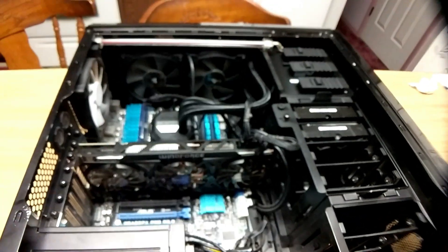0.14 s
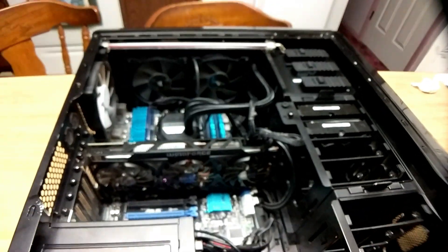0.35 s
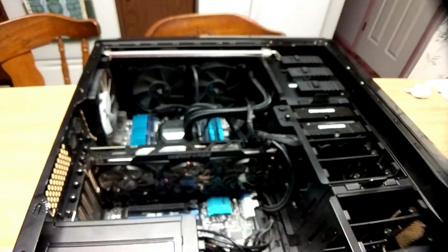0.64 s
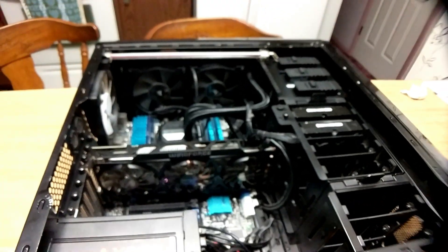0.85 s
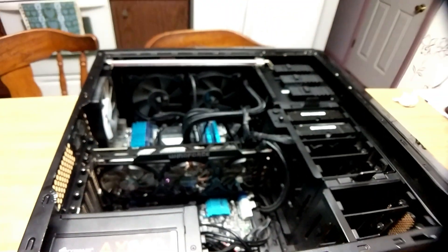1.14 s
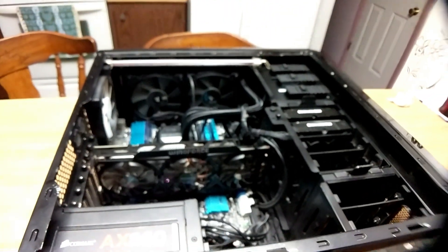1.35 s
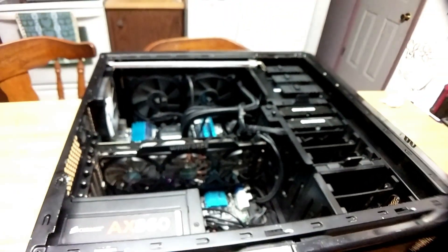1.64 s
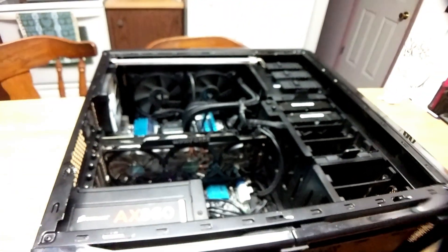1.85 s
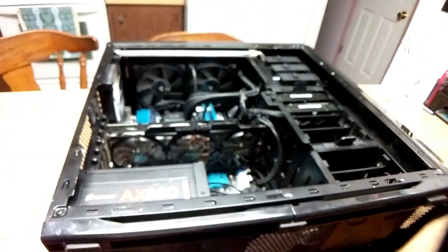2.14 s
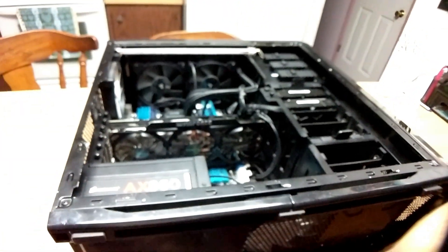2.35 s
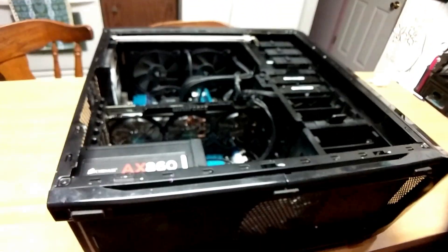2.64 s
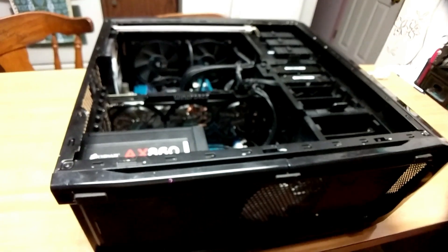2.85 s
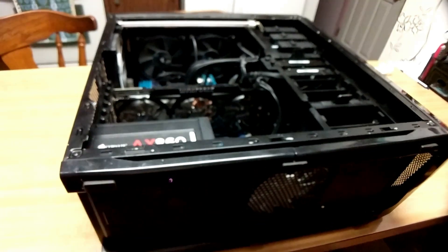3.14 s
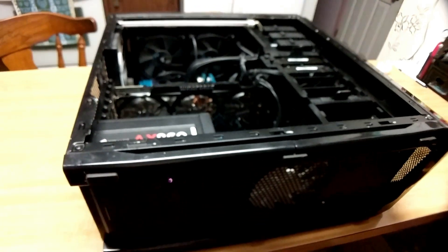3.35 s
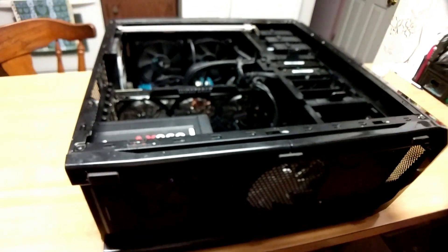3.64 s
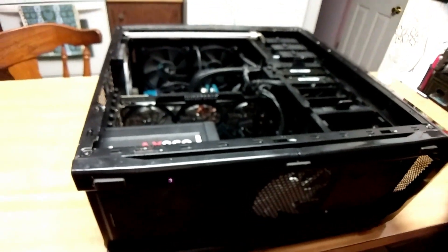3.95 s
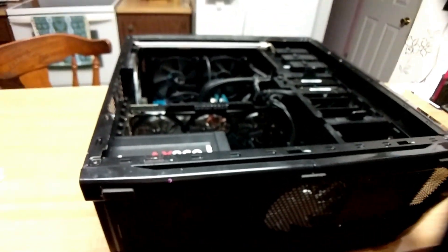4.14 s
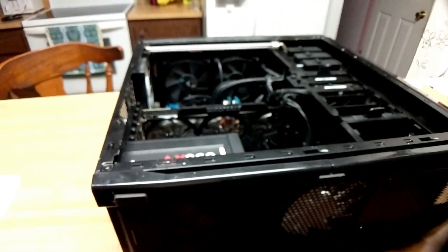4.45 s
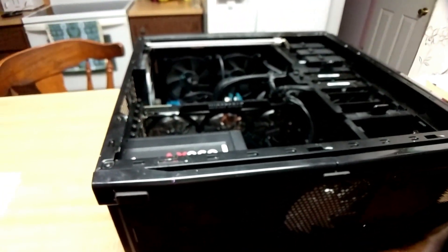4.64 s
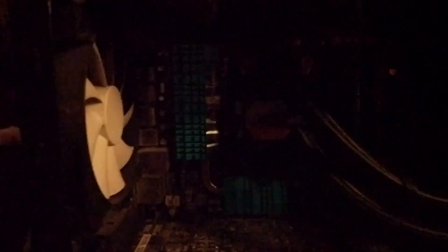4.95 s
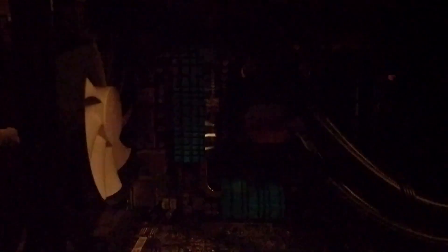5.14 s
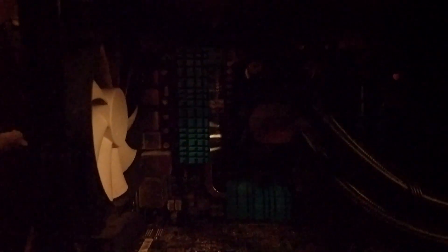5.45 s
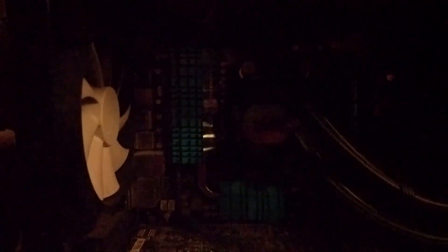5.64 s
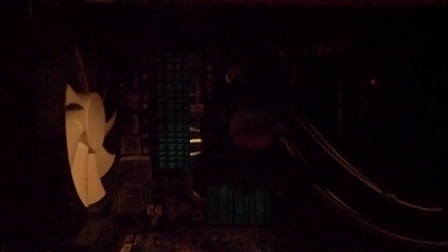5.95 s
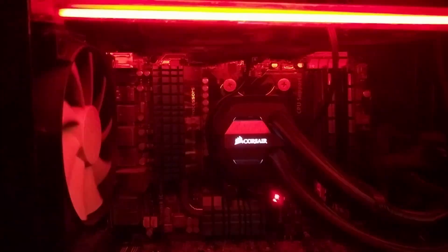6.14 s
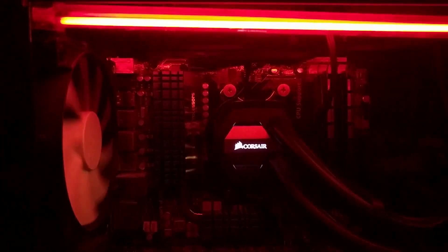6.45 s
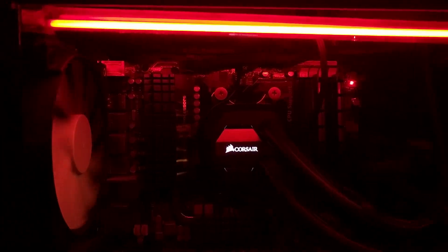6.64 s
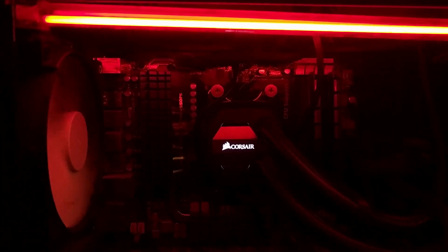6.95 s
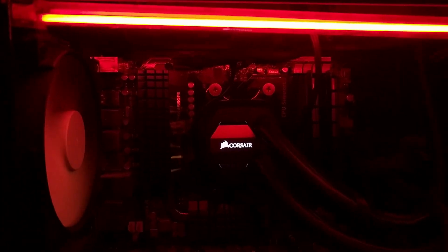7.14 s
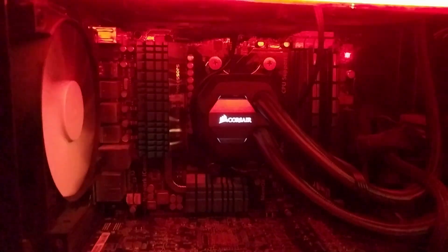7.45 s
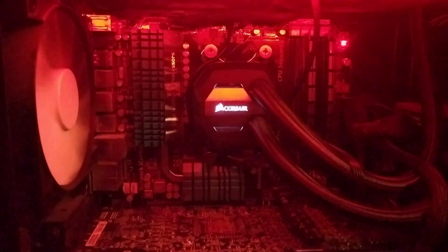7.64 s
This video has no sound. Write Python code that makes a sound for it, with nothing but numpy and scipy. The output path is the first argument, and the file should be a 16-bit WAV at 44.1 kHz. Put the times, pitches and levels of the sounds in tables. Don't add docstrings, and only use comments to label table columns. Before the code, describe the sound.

A handheld microphone moves round an open computer in a quiet room, with a low steady mains hum near 120 Hz, soft air noise and distant motor tones. A faint rub comes at 0.9 s; bassy grip thumps cluster at 1.5-1.9 with a small strap rasp, then more at 2.3 and 3.0. Tiny plastic creaks chirp at 2.0 and 2.5-2.9, and a hard dry knock lands at 3.9. At 4.75 the place switches abruptly to inside the metal case: brighter hissy air and thin fixed coil whine. A dull knock at 5.0 accompanies a drop in electric hiss. A power switch snaps at 6.0 and releases at 6.1; a knock and brief shrill squeal follow at 6.55. Fan tones climb from 6.7; at 7.15 the bass hum cuts out, a pump whistle sweeps upward, fading by 7.7, while blade tone and airy rush grow to the end, about 7.8.

```python
import sys
import numpy as np
from scipy import signal
from scipy.fft import rfft, irfft, next_fast_len
from scipy.io import wavfile
from scipy.ndimage import uniform_filter1d

SR = 44100
rng = np.random.default_rng(int(sys.argv[2]) if len(sys.argv) > 2 else 0)


def dump_mix(stems):
    frames = np.atleast_2d(stems).T
    limited = np.clip(frames, -1, 1)
    pcm = np.round(limited * 32767).astype(np.int16)
    wavfile.write(sys.argv[1], SR, pcm)


def convert_level_to_amplitude(level_db):
    exponent = np.asarray(level_db, float) / 20
    return 10 ** exponent


N = 343098
TIME = np.arange(N) / SR
MOVE_S, WIND_S = 4.745, 7.158


def curve(table):
    s, *columns = np.transpose(table)
    return [np.interp(TIME, s, column) for column in columns]


def level(x, db):
    return x * convert_level_to_amplitude(db) / np.sqrt(np.mean(x ** 2))


def walk(rate_hz):
    hold = int(SR / rate_hz)
    steps = np.repeat(rng.standard_normal(N // hold + 1), hold)
    return uniform_filter1d(uniform_filter1d(steps, hold), hold)[:N]


def step(s, fade_s):
    return np.clip((TIME - s) / fade_s, 0, 1)


def add(out, s, x):
    i = int(s * SR)
    out[i:i + len(x)] += x[:N - i]


def band(size, hz, width_hz):
    fast = next_fast_len(size)
    f = np.arange(fast // 2 + 1) * SR / fast + 1
    resonance = 1 / (1 + ((f - hz * hz / f) / width_hz) ** 2)
    noise = irfft(rfft(rng.standard_normal(fast)) * resonance, fast)
    return level(noise[:size], 0)


def tone(hz, db, from_s=0.):
    out, i = np.zeros(N), int(from_s * SR)
    turns = np.cumsum((hz + out)[i:]) / SR + rng.random()
    out[i:] = np.sqrt(2) * convert_level_to_amplitude((db + out)[i:]) * np.sin(2 * np.pi * turns)
    return out


def lines(table, waver_db, rate_hz, drift, from_s=0.):
    return sum(tone(hz * (1 + drift * walk(rate_hz)), db + waver_db * walk(rate_hz), from_s)
               for hz, db in table)


def overtones(base_hz, table, from_s):
    out = np.zeros(N)
    for multiple, hz, width_hz, db in table:
        pitch = multiple * base_hz
        resonance = 1 / (1 + (2 * (pitch - hz) / width_hz) ** 2) ** 2
        out += resonance * tone(pitch * (1 + .003 * walk(40)), db + 3.2 * walk(20), from_s)
    return step(from_s, .05) * out


def air(shape, modes, db, flicker_db):
    size = next_fast_len(N)
    f = np.arange(size // 2 + 1) * SR / size + 1
    shape_hz, shape_db = np.transpose(shape)
    gain_db = np.interp(np.log(f), np.log(shape_hz), shape_db, -90)
    for hz, width_hz, boost_db in modes:
        gain_db = gain_db + boost_db / (1 + (2 * (f - hz) / width_hz) ** 2)
    noise, swell_db = rfft(rng.standard_normal(size)) * convert_level_to_amplitude(gain_db), 1.07 * walk(1.38)
    scale = convert_level_to_amplitude(db) / np.std(irfft(noise * (f > 250), size))
    out = np.zeros(N)
    for centre_hz in 125 * 2. ** np.arange(8):
        octave = np.clip(1 - abs(np.log2(f / centre_hz)), 0, 1)
        out += irfft(noise * octave, size)[:N] * convert_level_to_amplitude(swell_db + flicker_db * walk(9))
    return scale * out


def ring(hits):
    out, t = np.zeros(N), np.arange(2000) / SR
    for s, db, hz, t60_ms in hits:
        onset = np.clip(6.3 * hz * t, 0, 1)
        decay = 1000. ** (-1000 * t / t60_ms)
        add(out, s, convert_level_to_amplitude(db) * np.sin(2 * np.pi * hz * t) * onset * decay)
    return out


def scrape(bursts, slips_hz):
    out, t = np.zeros(N), np.arange(4096) / SR
    slip = t * slips_hz
    for s, ms, db, hz, width_hz in bursts:
        press = np.clip(t / .0008, 0, 1) * np.clip(1 - (1000 * t / ms) ** 2, 0, 1)
        shape = press + 0.2 * np.exp(-t / 0.027)
        size = convert_level_to_amplitude(1.3 * np.tanh(rng.standard_normal(64)))[slip.astype(int) % 64]
        grip = 0.51 + size * np.exp(-(slip % 1) / 0.36)
        add(out, s, convert_level_to_amplitude(db) * shape * grip * band(len(t), hz, width_hz))
    return out


# t/s, f/Hz, level/dB
MAINS = [(0, 121.4, -46), (.5, 121.8, -45), (1, 122.9, -43.5), (2, 121.2, -42.5), (3.4, 122.8, -44.5),
         (4.5, 122.4, -43.5), (5.6, 122.4, -43.5), (6.3, 121.9, -44), (6.6, 121.9, -44.5),
         (7.2, 121.2, -44)]


def hum():
    hz, db = curve(MAINS)
    return tone(hz * (1 + 0.0041 * walk(7.6)), db + 0.48 * walk(21))


# f/Hz, level/dB per Hz
ROOM_COLOUR = [(94, -69), (160, -33), (201, -6.5), (249, -14), (274, -12), (307, -15.5), (358, -13.5),
               (688, -24), (1180, -18.5), (2010, -21), (2180, -22.5), (3320, -28.5), (11800, -35),
               (15700, -34.5)]
# f/Hz, width/Hz, boost/dB
ROOM_RESONANCES = [(1200, 450, 0), (1450, 88, -5.5), (1963, 28, -6.5), (11500, 1200, 4)]
# f/Hz, level/dB
ROOM_MOTOR = [(240.5, -64.5), (321, -71), (359, -70.5), (400, -71), (1184, -83)]


def room():
    return air(ROOM_COLOUR, ROOM_RESONANCES, -61.5, 1.0) + lines(ROOM_MOTOR, 1.3, 3.99, 0.0014)


# f/Hz, level/dB
STEADY_TONES = [(200.2, -61), (1363, -78.5)]


def steady_tones():
    return lines(STEADY_TONES, 1.35, 5.4, 0.00201)


# f/Hz, level/dB per Hz
CASE_COLOUR = [(94, -32), (160, -15), (205, -6), (254, -10), (279, -9.5), (426, -15.5), (601, -14),
               (787, -18), (1800, -17), (2740, -21.5), (3190, -19), (3450, -21), (8660, -27.5),
               (15700, -30)]
# f/Hz, width/Hz, boost/dB
CASE_RESONANCES = [(1750, 330, 3.4), (2820, 24, 1.6), (3220, 220, 2.6), (3790, 240, 6.7), (4920, 68, 3.4),
                   (5210, 130, 3.2), (5580, 140, 4), (6000, 150, 3.7), (8200, 1040, 6.8), (8800, 250, 4.2),
                   (15400, 500, 1.4)]


def case_air():
    return air(CASE_COLOUR, CASE_RESONANCES, -58.5, 1.0)


def hiss():
    stop_s, return_s = 5.035, 1.4
    before = convert_level_to_amplitude(-69.5) * (1 - step(stop_s, .02))
    back = convert_level_to_amplitude(-72) * step(stop_s, 2 * return_s)
    return (before + back) * (band(N, 5640.0, 700.) + band(N, 9100.0, 2500.))


# f/Hz, level/dB
COIL_TONES = [(170, -70), (2766, -89), (3268, -68), (5507, -78), (5911, -93), (6538, -93), (7388, -90),
              (7489, -88), (7911, -93), (8126, -88), (8230, -89), (8866, -80), (9500, -92), (10244, -89)]
# t/s, level/dB
COIL_LOUDNESS = [(4.75, 6), (5.1, 3.5), (5.25, 0), (6.1, 5), (6.5, 1.5), (6.7, -2.5), (7.78, -1)]


def coils():
    return convert_level_to_amplitude(curve(COIL_LOUDNESS)[0]) * lines(COIL_TONES, 1.7, 30, 0.000388, MOVE_S)


# f/Hz, level/dB
SQUEAL_TONES = [(13986, -81), (14120, -76), (14739, -84), (15353, -75)]
# t/s, t/s
SQUEAL_SPAN = (6.545, 6.73)


def squeal():
    start_s, end_s = SQUEAL_SPAN
    gate = step(start_s, .005) * (1 - step(end_s, .01))
    return gate * lines(SQUEAL_TONES, 1.5, 20, .0005, start_s)


# t/s of centre, peak level/dB, f/Hz, half length/ms
GRIP_THUMPS = [(1.507, -15, 80, 4), (1.526, -22, 65.4, 2.6), (1.558, -30.5, 57.3, 12),
               (1.619, -28, 114, 6.6), (1.663, -13.5, 112, 8.1), (1.665, -36, 65, 15.0),
               (1.665, -19.5, 151, 4.1), (1.69, -28.5, 124.4, 25), (1.898, -16, 102, 5.1),
               (1.906, -28, 59, 6.4), (1.914, -28, 136, 14.6), (2.233, -22, 81, 3.6),
               (2.273, -14, 102.4, 6.0), (2.291, -26, 82, 7.3), (2.987, -26, 54, 17),
               (2.989, -21.5, 123.5, 10.2), (4.367, -24.5, 60.5, 11), (5.281, -24, 58.95, 11.5),
               (5.33, -30, 58.95, 6.1), (7.139, -27.5, 53, 8.3),
               (1.82, -30, 114, 8.8), (2.33, -33, 50, 13), (3.029, -38, 44.4, 11), (3.766, -30, 56, 7.5),
                (4.409, -28, 45, 7.9), (4.441, -38, 60, 10), (5.36, -38, 55, 12)]


def grip_thumps():
    out, shaken = np.zeros(N), np.zeros(N)
    t = np.arange(-3000, 3000) / SR
    for s, db, hz, half_ms in GRIP_THUMPS:
        pulse = np.exp(-.5 * (1000 * t / half_ms) ** 2)
        add(out, s + t[0], -convert_level_to_amplitude(db) * pulse * np.cos(2 * np.pi * hz * t))
        shaken[int(s * SR)] += convert_level_to_amplitude(db)
    fade_s = 0.067
    return out, signal.lfilter([1], [1, -np.exp(-1 / (fade_s * SR))], shaken)


# t/s, level/dB
HAND_SWAY = [(0, -38), (.4, -36.5), (.63, -42.5), (1, -36.5), (1.3, -48), (1.7, -38), (2.4, -44.5),
             (2.55, -31.5), (2.7, -42), (3.3, -40.5), (3.7, -47.5), (4.2, -54), (4.45, -36.5), (5, -45.5),
             (5.6, -54), (6.16, -46), (6.5, -49.5), (7.1, -46)]


def hand_rumble(shaken):
    deep = convert_level_to_amplitude(curve(HAND_SWAY)[0] - 2 + 2.5 * walk(8.98)) + convert_level_to_amplitude(-28) * shaken
    shell = convert_level_to_amplitude(-57 + 3 * walk(6)) + convert_level_to_amplitude(-28) * shaken
    out = deep * (band(N, 12.1, 15.8) + 0.68 * band(N, 24.2, 10.5))
    return out + shell * band(N, 67.0, 56.0) + convert_level_to_amplitude(-56) * band(N, 124.5, 63.0)


def bass():
    thumps, shaken = grip_thumps()
    low_pass = signal.butter(4, 184, fs=SR, output="sos")
    low = signal.sosfiltfilt(low_pass, hum() + thumps + hand_rumble(shaken))
    return low * (1 - step(WIND_S, 0.0029))


# t/s, length/ms, level/dB, centre f/Hz, width/Hz
SKIN_RUBS = [(.9, 69, -55, 790, 1900), (.902, 87, -63, 9000, 9000), (1.633, 61, -54, 6900, 5000),
             (1.627, 55, -56.5, 1260, 600), (1.861, 65, -63.5, 7500, 6000), (1.875, 33, -61, 1400, 1800),
             (3.893, 58, -46.5, 1640, 1140), (3.892, 62, -58, 8000, 12000), (3.893, 55, -52, 520, 540),
             (5.87, 40, -64, 1800, 1500), (6.002, 19, -51, 2400, 3000), (6.093, 34, -43.5, 2660, 2700),
             (6.09, 43, -52.5, 860, 870), (6.095, 22, -59, 12000, 7000), (6.58, 60, -51.5, 520, 940)]
# t/s, length/ms, level/dB, centre f/Hz, width/Hz
SHORT_SNAPS = [(1.622, 16, -57, 7950, 6000), (1.642, 15, -53, 4000, 2500), (1.883, 15, -57, 6150, 7000),
               (5.006, 14, -55, 6000, 12000), (5.252, 5.4, -53, 7900, 14000), (5.9, 10, -53.5, 1500, 2000),
               (5.878, 10, -57, 2300, 1000), (5.944, 8.9, -55.5, 900, 1200), (5.984, 8, -39.5, 13700, 5030),
               (5.985, 12, -46.5, 2960, 5000), (6.071, 6.1, -44.5, 6450, 9000),
               (6.088, 7, -40.5, 14000, 6000), (6.571, 18, -54, 7000, 12000)]


def scuffs():
    return scrape(SKIN_RUBS, 134.5) + scrape(SHORT_SNAPS, 200)


# t/s, peak level/dB, start f/Hz, body ring level/dB
PLASTIC_CREAKS = [(2.019, -59, 3000, -70), (2.026, -54, 2390, -70), (2.062, -57, 2400, -70),
                  (2.555, -50.5, 1820, -48.5), (2.716, -49, 2400, -47.5), (2.788, -48.5, 2370, -47.5),
                  (2.916, -52, 2800, -51)]


def creaks():
    end_hz, length_ms = 4450, 5.4
    body = [(s + .002, body_db, 830, 20) for s, _, _, body_db in PLASTIC_CREAKS]
    grit = [(s, length_ms, body_db - 6.5, 1800, 2000) for s, _, _, body_db in PLASTIC_CREAKS]
    out = ring(body) + scrape(grit, 200)
    part = np.clip(1000 * np.arange(2000) / SR / length_ms, 0, 1)
    for s, db, start_hz, _ in PLASTIC_CREAKS:
        turns = np.cumsum(start_hz + (end_hz - start_hz) * part ** 0.84) / SR
        add(out, s, convert_level_to_amplitude(db) * np.sin(np.pi * part) * np.sin(2 * np.pi * turns))
    return out


# t/s, peak level/dB, f/Hz, t60/ms
KNOCKS = [(.903, -44, 900, 8), (2.252, -49, 10000, 4), (3.882, -29, 1500, 2.3), (3.8916, -20.5, 1380, 3.6),
          (3.8915, -31, 416, 11), (3.893, -36, 587, 16), (1.635, -44, 4200, 11), (1.635, -41, 9800, 7),
          (1.644, -40, 3480, 5.1), (5.007, -20, 472, 2.8), (5.012, -23.5, 368, 7.7),
          (5.013, -32.5, 1260, 3.1), (6.5707, -20.5, 368, 15), (6.5709, -23.5, 1496, 1.24),
          (6.5737, -24.5, 170, 19), (7.322, -47, 370, 40)]


def ticks():
    rasp = [(1.635 + k * 0.0094, -43.5 - k, 6980, 7) for k in range(4)]
    return ring(KNOCKS + rasp)


# t/s, peak level/dB, f/Hz, t60/ms
SWITCH_CLICKS = [
    (5.985, -35, 15000, 12),
    (5.985, -32.5, 5150, 24),
    (6.088, -33, 15300, 10),
    (6.088, -35, 11800, 6),
    (6.097, -49, 2830, 27),
    (6.1, -42, 1490, 42),
    (6.105, -51, 2240, 30),
]


def switch():
    return ring(SWITCH_CLICKS)


def rush():
    return convert_level_to_amplitude(-68) * step(7.0, .6) * (band(N, 2400., 2000.) + .8 * band(N, 13000., 7000.))


def airflow():
    flow_db = -69 + 2.5 * (TIME - MOVE_S) + 3.0 * step(7.4, 0.41)
    return convert_level_to_amplitude(flow_db) * band(N, 295.0, 670.0) + convert_level_to_amplitude(-63.5) * band(N, 94.0, 60.)


# t/s, f/Hz, level/dB
PUMP_WHISTLE = [
    (7.15, 4000, -92),
    (7.27, 4480, -77),
    (7.34, 4850, -72),
    (7.43, 5320, -72),
    (7.5, 5680, -82),
    (7.7, 6500, -90),
]
# multiple, level/dB
PUMP_TONES = [(1, 0), (4 / 3, -8), (2, -6), (3, -7)]
# multiple, resonance f/Hz, width/Hz, level/dB
PUMP_OVERTONES = [(2.42, 10400, 500, -79), (2.3, 14000, 600, -81), (1.77, 10500, 600, -83),
                  (2.8, 15300, 600, -83)]


def pump():
    hz, db = curve(PUMP_WHISTLE)
    start_s = PUMP_WHISTLE[0][0]
    out = overtones(hz, PUMP_OVERTONES, start_s)
    for multiple, tone_db in PUMP_TONES:
        out += tone(multiple * hz, db + tone_db + 1.5 * walk(25), start_s) * step(start_s, .03)
    return out


# t/s, f/Hz, level/dB
BLADE_TONE = [
    (7.17, 140, -63),
    (7.33, 152.2, -57.5),
    (7.64, 195.5, -54.5),
    (7.78, 200, -55),
]
# t/s, f/Hz
FAN_SPIN = [(6.7, 115), (7.02, 137.2), (7.25, 154.7), (7.35, 161.5), (7.6, 173.9), (7.78, 180.6)]
# multiple, resonance f/Hz, width/Hz, level/dB
FAN_OVERTONES = [(1.76, 310, 12, -65), (4, 622, 40, -69.5), (5, 885, 110, -67), (6, 930, 60, -70),
                 (7, 1180, 260, -67), (9, 1200, 560, -71), (9, 1590, 170, -65.5), (11, 1750, 110, -71),
                 (14, 2400, 40, -72)]


def fans():
    hz, db = curve(BLADE_TONE)
    blades = tone(hz * (1 + 0.02 * walk(40)), db + 3.0 * walk(35)) * step(BLADE_TONE[0][0], .03)
    return blades + overtones(curve(FAN_SPIN)[0], FAN_OVERTONES, FAN_SPIN[0][0])


def scene():
    inside = case_air() + hiss() + coils() + squeal() + airflow() + pump() + fans()
    moved = step(MOVE_S, 0.0075)
    places = (1 - moved) * room() + moved * inside + steady_tones()
    handling = bass() + scuffs() + creaks() + ticks()
    return np.array([places + handling + switch() + rush()])


def band_limit(x):
    return signal.sosfilt(signal.butter(12, 16650, fs=SR, output="sos"), x)


def record(dry):
    wind_filter = signal.butter(2, 90, "high", fs=SR, output="sos")
    thin = signal.sosfilt(wind_filter, dry)
    windy = step(WIND_S, 0.0035)
    top_shelf = signal.ellip(10, .2, 26, 15780, fs=SR, output="sos")
    mix = signal.sosfilt(top_shelf, (1 - windy) * dry + windy * thin)
    return band_limit(mix)


dry = scene()
out = record(dry)
dump_mix(out)
```